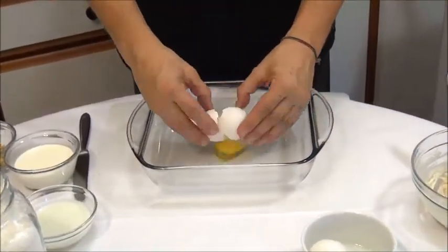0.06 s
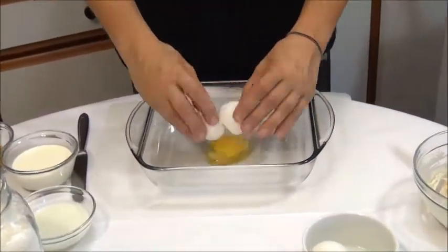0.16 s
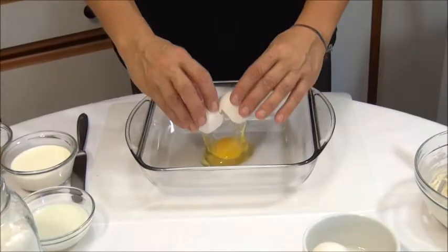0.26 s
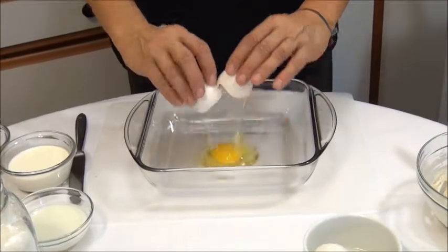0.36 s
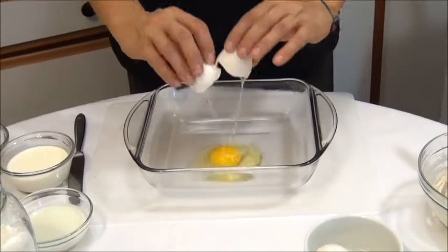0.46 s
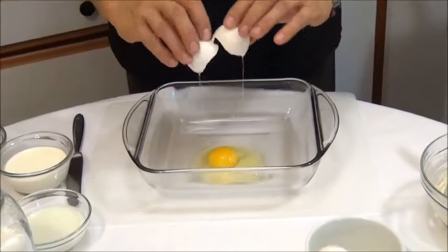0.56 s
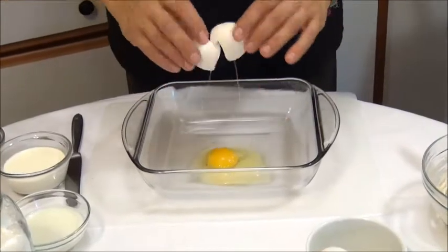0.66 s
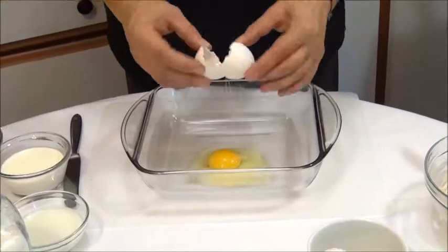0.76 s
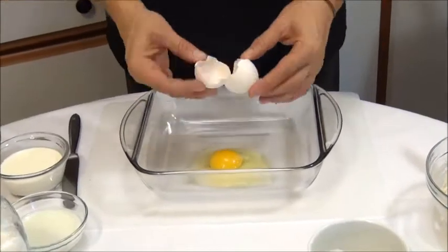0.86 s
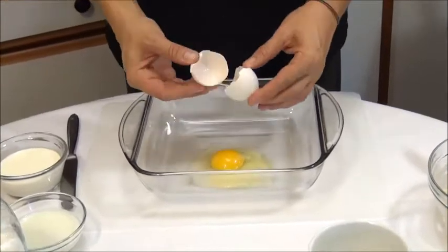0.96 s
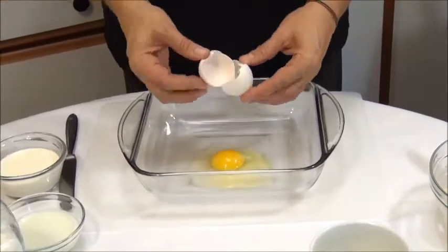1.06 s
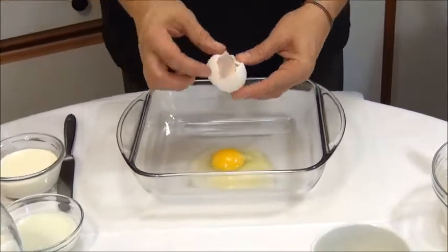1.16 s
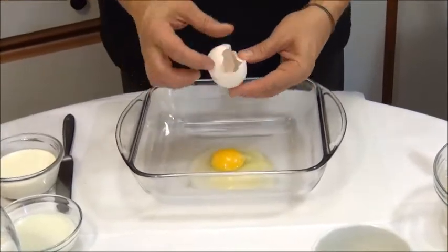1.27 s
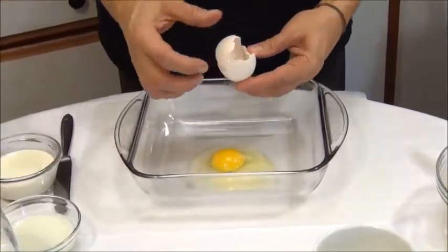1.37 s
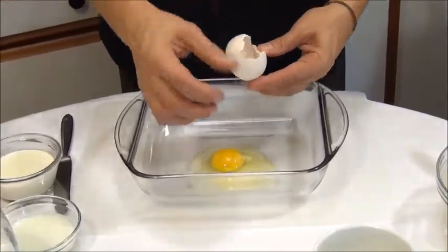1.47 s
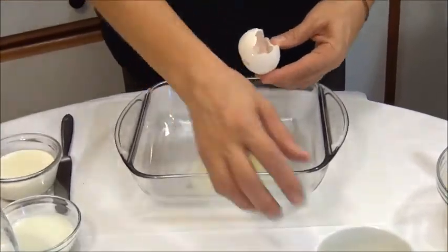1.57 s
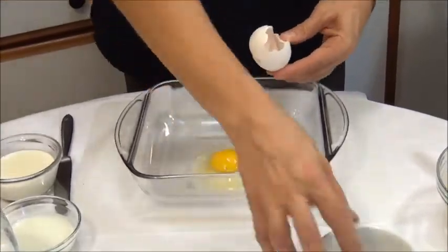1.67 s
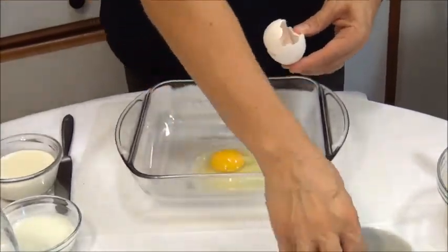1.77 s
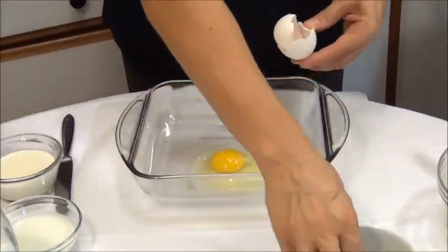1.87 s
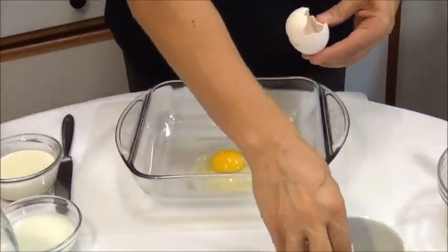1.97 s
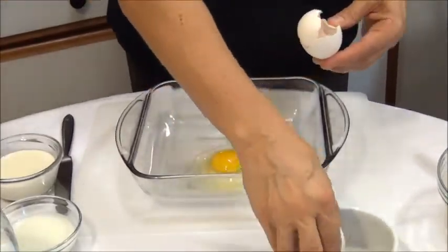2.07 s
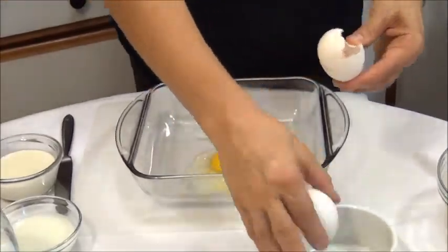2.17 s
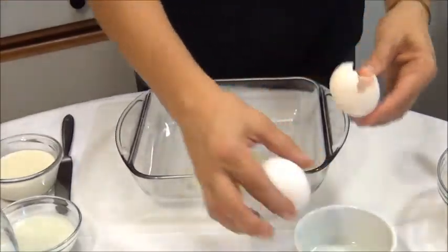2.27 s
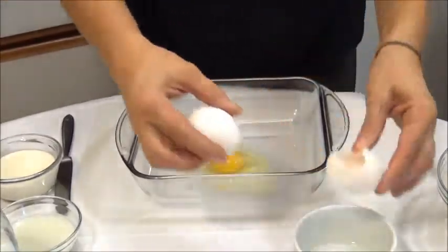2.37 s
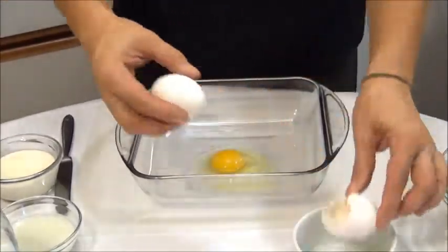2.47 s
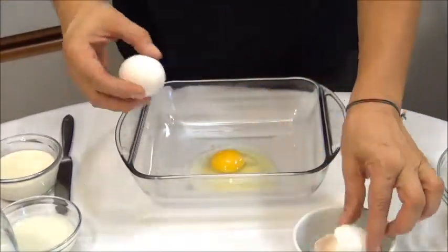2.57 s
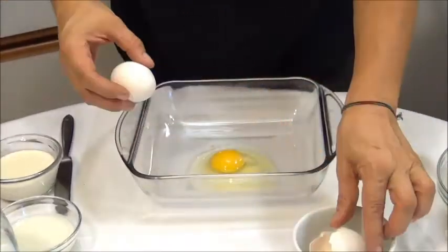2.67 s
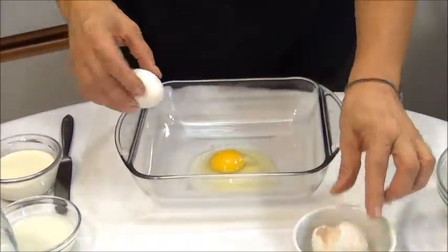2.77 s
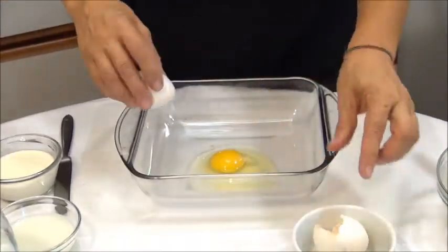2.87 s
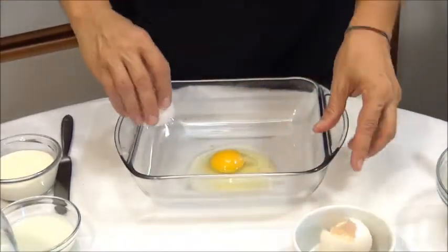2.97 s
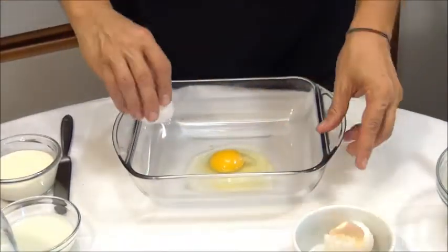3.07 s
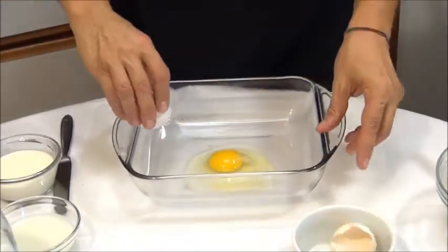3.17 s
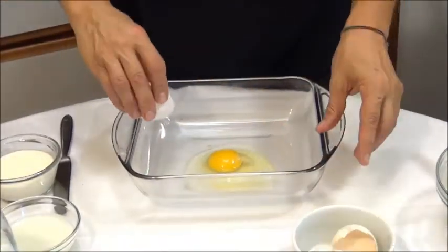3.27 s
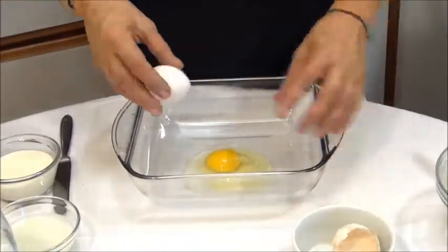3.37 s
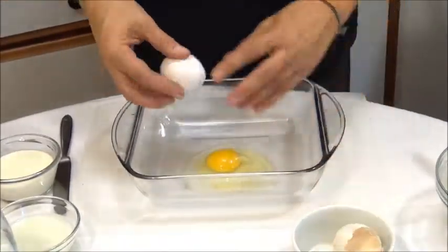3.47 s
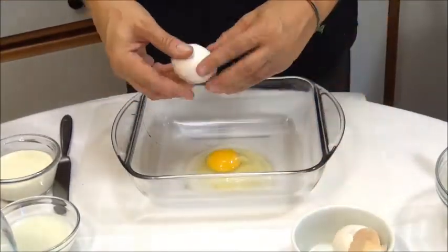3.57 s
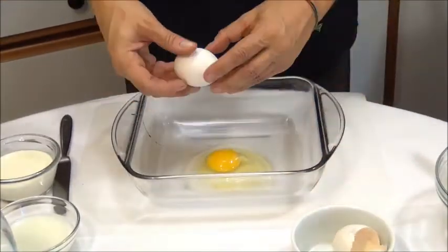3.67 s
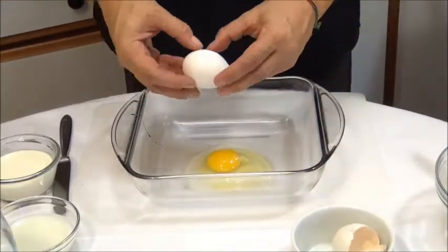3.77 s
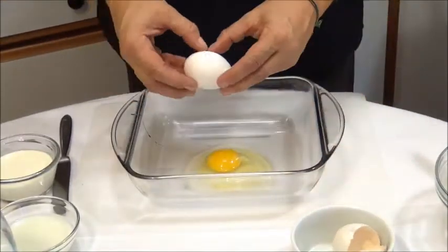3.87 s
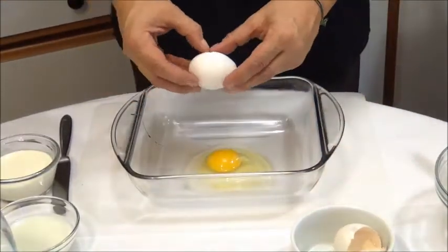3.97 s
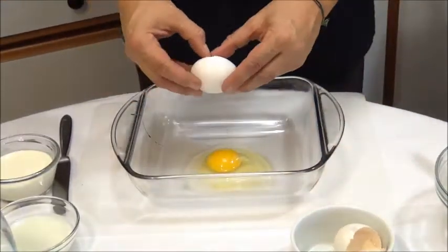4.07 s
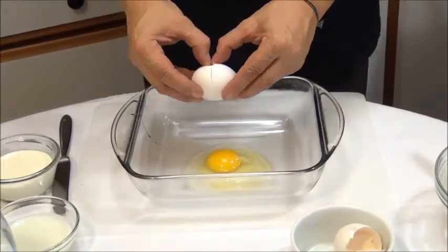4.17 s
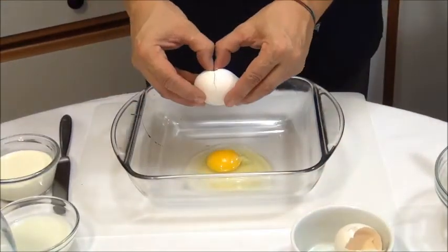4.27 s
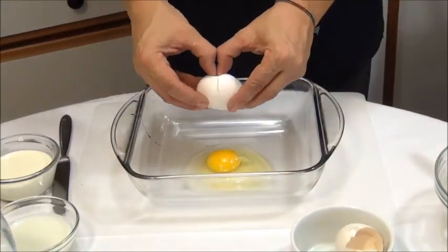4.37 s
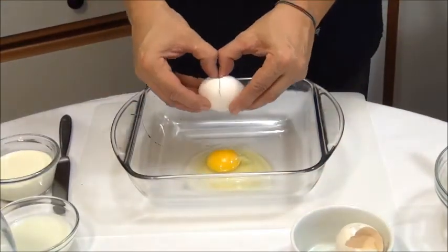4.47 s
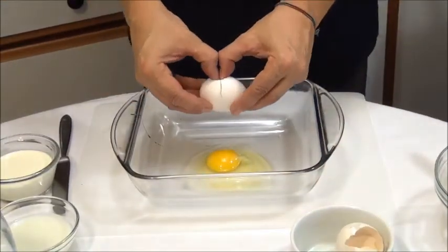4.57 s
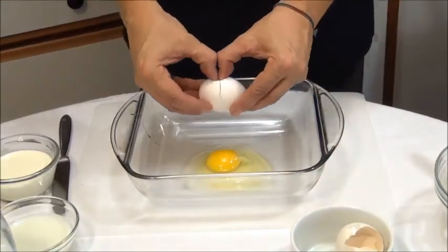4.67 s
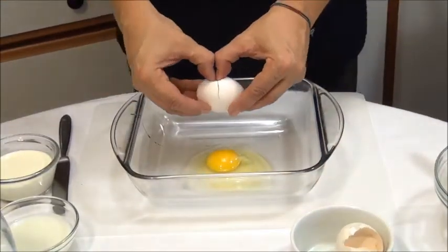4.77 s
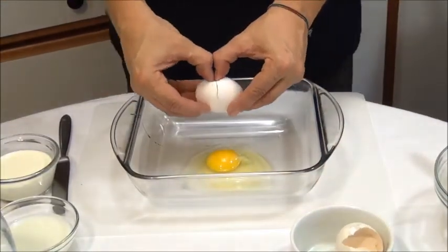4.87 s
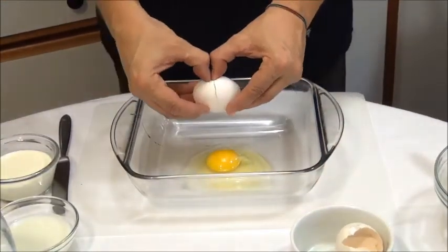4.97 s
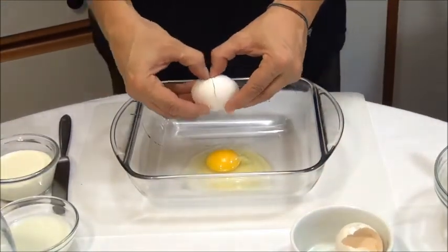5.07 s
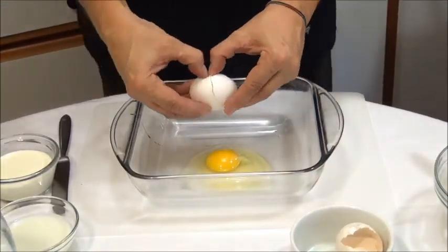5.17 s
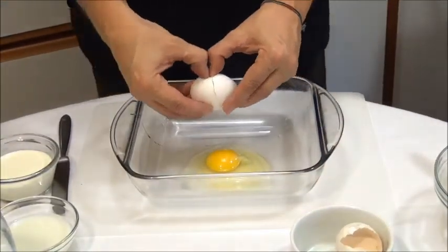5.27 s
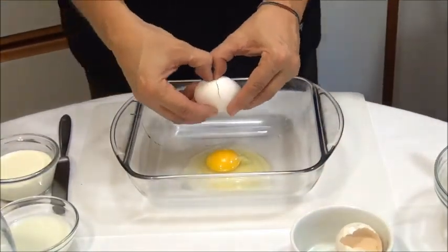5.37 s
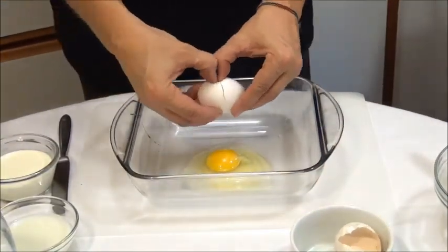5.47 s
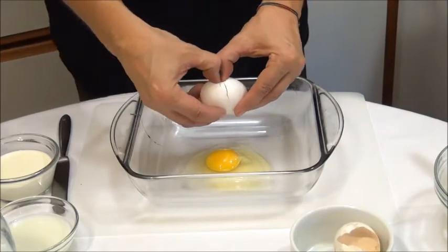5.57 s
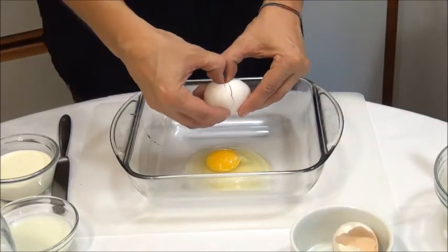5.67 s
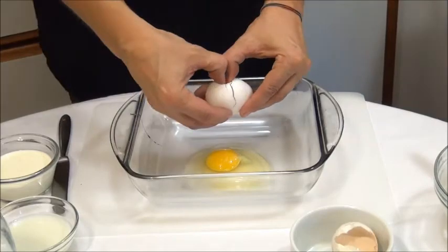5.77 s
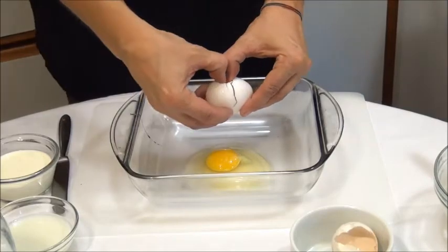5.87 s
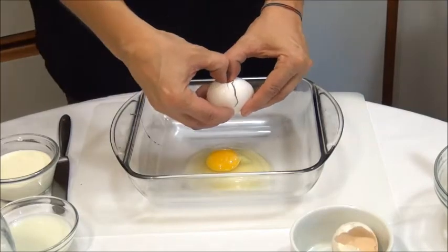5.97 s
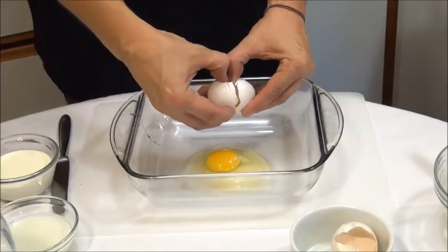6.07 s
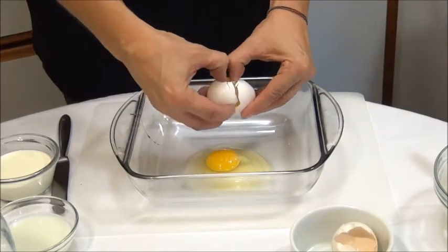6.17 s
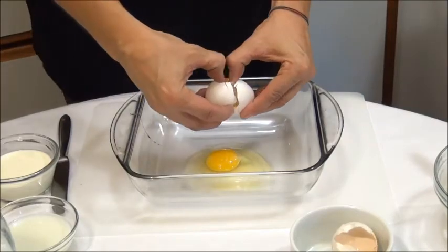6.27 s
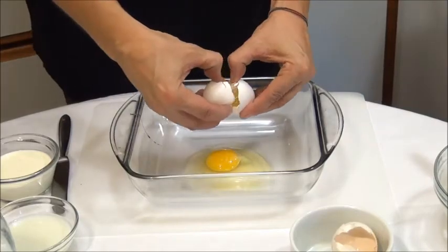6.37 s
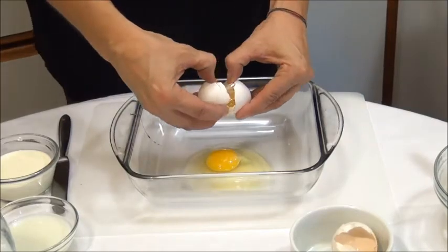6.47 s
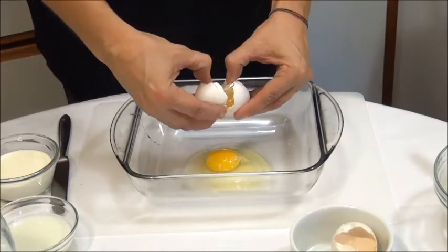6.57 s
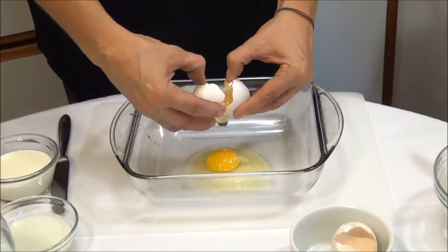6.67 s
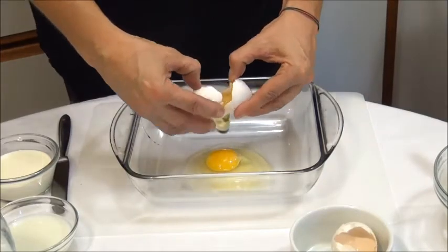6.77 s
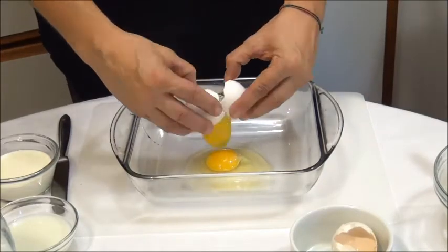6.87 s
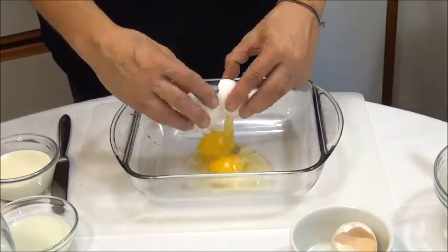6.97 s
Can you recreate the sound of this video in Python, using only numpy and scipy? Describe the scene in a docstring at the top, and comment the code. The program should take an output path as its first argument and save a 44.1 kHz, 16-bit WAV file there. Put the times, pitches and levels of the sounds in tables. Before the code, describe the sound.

An eggshell snaps and crackles apart right at the start, each crack a bright tick with a short hollow ring. Small shell ticks follow, then a loud, hollow crunch at about 1.2 seconds as the halves are pushed together. Around 1.8 seconds a china bowl is bumped and drags briefly on the tablecloth with a soft thud and rustle. At 2.7 seconds the empty shell drops into the bowl with a sharp, loud clink. A second egg knocks on the rim of a glass dish at 3.0 and 3.2 seconds, the shell crunching and the glass ringing briefly, the second knock softer. Faint, scattered ticks continue until about 6 seconds, when the shell tears open in a run of light snaps and crackles lasting to about 7 seconds. Everything is close and nearly mono, with slight kitchen reverberation over faint hum and hiss.

```python
"""Breaking eggs over a glass dish

A quiet kitchen, a near-mono microphone pair on hands working at a cloth-covered table.
Shells snap and crunch, each crack a bright tick plus the hollow ring of the half shell.
An egg is lifted from a china bowl, which drags on the cloth, and empty shells drop into it.
Two knocks of the egg on the rim set the glass dish ringing; room tone lies underneath."""
import sys
import numpy as np
from scipy import signal
from scipy.fft import rfft, irfft
from scipy.io import wavfile
from scipy.ndimage import uniform_filter1d

SR = 44100
rng = np.random.default_rng(int(sys.argv[2]) if len(sys.argv) > 2 else 0)


def wav_out(sig):
    """Save sig, one row per channel (or a flat mono array), as 16-bit PCM at SR to the path in sys.argv[1]."""
    wavfile.write(sys.argv[1], SR, np.round(np.clip(np.atleast_2d(sig).T, -1, 1) * 32767).astype(np.int16))


N = 309582

# shell fractures: t/s, hollow ring level/dB, cup f/Hz, tick level/dB
SHELL_SNAPS = [(0.028, -26.5, 1890, -65), (0.046, -27.5, 2050, -51), (0.056, -25, 1730, -58),
               (0.1376, -33, 1740, -55), (0.165, -23.5, 1700, -48), (0.1804, -27.5, 1700, -53),
               (0.3192, -52, 1820, -59.5), (0.677, -45.5, 2150, -67), (0.754, -48, 2120, -61),
               (0.841, -46, 2130, -57.5), (0.8759, -47.5, 2050, -66), (0.9092, -48, 2140, -53.5),
               (0.9376, -62, 1380, -57), (1.0827, -41.5, 2970, -55), (1.1072, -38, 1980, -48.5),
               (1.1314, -29, 2070, -49), (1.1532, -30, 1410, -59), (1.1608, -17.5, 2000, -41),
               (1.1671, -12.5, 1807, -40.5), (1.1774, -20.5, 2000, -49), (2.8895, -46, 1840, -59),
               (3.5346, -53, 920, -57.5), (3.6192, -70, 930, -54.5), (3.7118, -57, 3440, -58),
               (4.0099, -55.5, 2784, -63.5), (4.1675, -70, 2790, -55.5), (4.27, -59.5, 2970, -47.5),
               (4.4143, -51, 1394, -63), (4.6147, -46, 1567, -46), (4.9126, -70, 920, -56),
               (5.005, -69.5, 1616, -58.5), (5.712, -49.5, 1614, -73), (5.7322, -45.5, 1580, -60),
               (6.0531, -54, 1540, -58.5), (6.073, -59, 3410, -48), (6.132, -52, 3420, -48.5),
               (6.14, -51, 3120, -43), (6.1524, -41.5, 3160, -44.5), (6.2812, -50, 2260, -58),
               (6.348, -41.5, 2230, -47.5), (6.4978, -47.5, 1940, -57), (6.5084, -38, 2390, -58),
               (6.5608, -42.5, 1870, -52), (6.683, -41, 1660, -78), (6.7324, -40, 1626, -53),
               (6.7794, -42.5, 1340, -57), (6.84, -45, 1600, -61), (6.8684, -36.5, 2170, -49.5),
               (6.9224, -43, 1530, -58), (6.9442, -41, 1580, -49.5), (6.9917, -57, 1680, -56),
               (7.002, -44, 1660, -50.5)]
# shell set against shell, china or table without breaking: columns as for the fractures
SHELL_BUMPS = [(0.547, -52.5, 1320, -74), (0.726, -39, 1180, -64), (1.4305, -40, 1065, -59),
               (1.7886, -34.5, 1460, -64), (1.8256, -38, 2440, -40), (2.677, -7, 1988, -42)]
# bouts of shell being torn or rubbed: peak t/s, length/s, hollow level/dB, bright level/dB, cup f/Hz
CRUNCH_BOUTS = [(0.026, 0.21, -49, -60, 1790), (0.183, 0.096, -55, -50, 1770),
                (0.681, .1, -59.5, -65, 1700), (0.748, 0.16, -66, -63, 2150),
                (0.919, 0.14, -72, -63.5, 2100), (1.127, 0.19, -50, -55.5, 1890),
                (1.168, 0.082, -38, -42, 1720), (2.895, 0.27, -62, -62.5, 1880),
                (6.074, 0.06, -73.5, -70, 1810), (6.152, 0.055, -53, -48.5, 2540),
                (6.263, 0.22, -70, -87, 2420), (6.377, .25, -70, -67, 2300), (6.534, .2, -64, -70, 2170),
                (6.738, .16, -59.5, -59.5, 1540), (6.87, 0.29, -65.5, -67, 2040),
                (6.995, 0.27, -59, -70, 1570)]
# modes of the half shell's hollow: ratio to cup pitch, width/Hz, level/dB
CUP_MODES = [(0.998, 200.8, 2.5), (1.35, 296.8, -7.5), (1.75, 260, -6)]
# lower modes of shell and yolk: f/Hz, width/Hz, level/dB
BODY_MODES = [(797, 75, 6), (990, 130, 3), (523, 200, -4.5)]
# spans in which the handled shell still holds its yolk: from t/s, to t/s
YOLK_SPANS = [(0, .25), (2.8, 6.6)]
# spectrum of a brittle fracture: f/Hz, level/dB
FRACTURE_SPECTRUM = [(290, -33), (500, -1), (1320, -4), (3300, 5.5), (4000, 0.5), (4800, -5), (5600, 0.5),
                     (6600, 2.5), (8580, 0), (16000, -2)]
# egg on the rim: t/s, crush level/dB, crush decay/s, crush tilt/(dB/octave), table level/dB,
# glass level/dB, glass hardness/(dB/octave), hush of the still-point modes/dB
RIM_KNOCKS = [(3.0167, -21, 0.026, -1.5, -38, -0.3, 0.06, -0.2),
              (3.2069, -31, 0.023, -1, -38, -2.5, -2.1, -11.5)]
# shell caving in on glass: f/Hz, level/dB
CRUSH_SPECTRUM = [(100, -43), (200, -16.5), (514, -17.5), (905, -6.5), (1360, -9), (2000, -11.5),
                  (4670, -17.5), (6020, -11.5), (11000, -15.5), (16000, -26)]
# glass dish: f/Hz, level/dB, t60/s, whether a knock beside the mode's still point hushes it
DISH_MODES = [(350, -46, .8, False), (628, -44, .2, True), (921, -27.5, .72, False), (927, -22, .15, False),
              (1030, -29, .2, True), (1163, -42, .4, False), (1390, -20, .23, True), (1947, -40, .3, False),
              (2328, -37, .2, True), (3252, -42.5, .33, False), (3260, -40.5, .36, False),
              (3695, -43.5, .13, False), (4055, -35, .22, True), (5975, -32, .15, True),
              (6007, -31.5, .18, False), (7185, -38.5, .15, True), (8580, -47.5, .16, False),
              (9900, -41.5, .13, False)]
# china bowl: f/Hz, level/dB, t60/s
BOWL_MODES = [(2370, 0.5, 0.09), (4870, -41.5, 0.091), (5460, -27.5, 0.055), (5840, -12.5, .09),
              (6040, -11.5, 0.13), (6130, -9.5, 0.1), (6100, -14.5, .09), (10900, -30.5, 0.18)]
# taps on the bowl: t/s, level/dB, hardness/(dB/octave), contact/s
BOWL_HITS = [(1.758, -64, 4, 0.0034), (1.789, -62, 7, 0.0019), (1.822, -38, -9, 0.00053),
             (1.845, -30.5, -24, 0.0051), (2.674, -31.5, 5, 0.0018)]
# table top: f/Hz, level/dB, t60/s
TABLE_MODES = [(59, -1.5, .33), (65, -2.5, 0.35), (110, -6, 0.33), (140.3, -1.5, 0.28), (216, -3.5, 0.17),
               (262, -8, .2), (300, 4, 0.13), (430, -15, 0.35), (515, -14.5, 0.11), (573.5, -12, .15),
               (1000, -20, 0.078), (1470, -23, 0.023)]
# fingers and bowl landing on the table: t/s, level/dB, hardness/(dB/octave), contact/s
TABLE_HITS = [(0.7265, -53.5, 5.5, 0.00048), (1.7368, -47, 9, 0.0012), (1.788, -45.5, 9.5, 0.002),
              (2.675, -53.5, 6.5, 0.0016)]
# the bowl dragging on the cloth: t/s, table rumble level/dB, rustle level/dB
DRAG_CURVE = [(1.74, -51, -99), (1.768, -48, -76), (1.816, -58, -80), (1.822, -40.5, -69),
              (1.892, -75, -73), (1.93, -71, -65), (2.096, -68, -61), (2.2, -87, -93)]
# early echoes off table, chest and cupboards: delay t/s, level/dB
EARLY_ECHOES = [(.0045, -12.5), (.0093, -10.5), (0.0155, -14.5), (.022, -14), (0.028, -17.5)]
# decay of the kitchen: f/Hz, t60/s
ROOM_DECAY = [(100, .45), (500, 0.52), (1800, 0.39), (5000, 0.4), (13000, 0.19)]
# reverberation that reaches the two microphones in opposite phase: f/Hz, level/dB
ROOM_SIDE_SPECTRUM = [(60, -13), (400, -17), (1200, -13), (2400, -41), (7000, -6), (10000, -8),
                      (12000, -39.5)]
# room tone and hiss: f/Hz, relative level/dB
ROOM_TONE_SPECTRUM = [(15, -38), (25, -3.5), (137, -2), (170, -3), (206, -14), (249, 0), (270, -17),
                      (344, -4), (775, -11), (840, -12), (1190, -10.5), (1560, -12.5), (2480, -14),
                      (3920, -18), (16000, -20.5)]
# likeness of the room tone at the two microphones: f/Hz, correlation
ROOM_TONE_LIKENESS = [(60, 1), (180, 0.81), (550, 0.94), (1650, 1), (4970, 1), (15000, 0.95)]
# two wavering hums and a thin high hiss: f/Hz, width/Hz, level/dB
HUM_BANDS = [(241, 11, -79.5), (320, 20, -83.5), (15000, 440, -83)]
# imbalance of the microphone pair: f/Hz, left minus right level/dB
MIC_IMBALANCE = [(40, -4.5), (125, -2.5), (250, -0.6), (550, 1.5), (1650, 0.7), (4970, 0.1), (15000, 0.0)]
# microphone bass roll-off: f/Hz, level/dB
MIC_LOW_CUT = [(20, -9), (42, -6.5), (56, -0.5)]

FULL_DB, EMPTY_DB = -16.5, -36  # low body ring relative to the hollow ring, with and without yolk
CHIP_HZ, BUMP_HZ, TICK_SCATTER_OCTAVES = 8840, 4450, .18  # tick pitch: flying chip, dull bump
LEAD_SHARE, HOLLOW_FADE_DB, BRIGHT_FADE_DB = 0.38, -35, -25.5  # crunch: swell over length; fade per length
ROOM_TONE_DB, DRIFT_DB, BAND_LIMIT_HZ = -67, 1.6, 16300


def shell_cracks():
    """Each fracture or bump is a tick plus the short hollow ring of the half shell."""
    out, t = np.zeros(N), np.arange(1500) / SR
    ratio, width, cup_db = np.transpose(CUP_MODES)
    body_hz, body_width, body_db = np.transpose(BODY_MODES)
    body = ring(body_hz, body_db, 1.7 / body_width)[:len(t)]
    cup_decay = gain_of(cup_db) * np.exp(-np.pi * width * t[:, None])
    build_up = 1 - np.exp(-(t / 0.0012) ** 2)  # the air in the cup takes a few cycles to build
    burst = np.exp(-t / 0.002) + 0.25 * np.exp(-t / 0.0054)  # the crack runs on after the first break
    burst /= np.sqrt(np.mean(burst[:130] ** 2))  # rms 1 over the first 3 ms
    events = [(*row, CHIP_HZ) for row in SHELL_SNAPS] + [(*row, BUMP_HZ) for row in SHELL_BUMPS]
    noise = rng.standard_normal((len(events), len(t) + 1))
    chip_sizes, hisses = np.clip(noise[:, 0], -2, 2), colour(noise[:, 1:], FRACTURE_SPECTRUM)
    for (s, hollow_db, cup_hz, tick_db, usual_hz), size, hiss in zip(events, chip_sizes, hisses):
        cup = build_up * (cup_decay * np.sin(2 * np.pi * cup_hz * ratio * t[:, None])).sum(1)
        low_db = FULL_DB if any(start <= s < end for start, end in YOLK_SPANS) else EMPTY_DB
        add(out, s - .001, gain_of(hollow_db) * (cup + gain_of(low_db) * body))
        hz = usual_hz * 2 ** (TICK_SCATTER_OCTAVES * size)  # chip size sets the pitch
        tick = colour(hiss, [(hz * .36, -13), (hz * .73, -8), (hz, 0), (hz * 1.3, -9), (hz * 2.2, -18)])
        add(out, s, gain_of(tick_db) * unit_rms(tick) * burst)
    return out


def shell_crunch():
    """Dense micro-cracks crackle and ring the half shell; each bout swells fast and fades."""
    out, cup_clicks = np.zeros(N), grains(per_s=700, spread_db=1.7)
    crackle = unit_rms(colour(grains(per_s=2500, spread_db=3.8), FRACTURE_SPECTRUM))
    for s, length, hollow_db, bright_db, cup_hz in CRUNCH_BOUTS:
        near = slice(max(round(s * SR) - SR // 2, 0), round(s * SR) + SR // 2)
        t = np.arange(N)[near] / SR - s
        from_peak = np.maximum(t, -t / LEAD_SHARE) / length
        cup = np.zeros(len(t))
        for ratio, width, db in CUP_MODES:
            mode = resonate(cup_clicks[near], cup_hz * ratio, width)
            cup += gain_of(db) * resonate(mode, cup_hz * ratio, 2 * width) / width
        out[near] += gain_of(hollow_db + HOLLOW_FADE_DB * from_peak) * unit_rms(cup)
        out[near] += gain_of(bright_db + BRIGHT_FADE_DB * from_peak) * crackle[near]
    return out


def rim_crush():
    """The egg hits the rim: its shell caves in and the blow pushes the table."""
    out, t = np.zeros(N), np.arange(8000) / SR
    for s, crush_db, decay, tilt, push_db, *_ in RIM_KNOCKS:
        splinters = rng.standard_normal(len(t))
        splinters *= gain_of(1.5 * rng.standard_normal(len(t) // 40)).repeat(40)  # rough, about 1 ms a step
        envelope = (1 - np.exp(-t / .001)) * np.exp(-t / decay)
        spectrum = [(hz, db + tilt * np.log2(hz / 1000)) for hz, db in CRUSH_SPECTRUM]
        add(out, s - .001, gain_of(crush_db) * unit_rms(colour(splinters, spectrum)) * envelope)
        add(out, s, struck(TABLE_MODES, [(.004, push_db, -1.8, 0.0036)], pivot_hz=107))
    return out


def glass_dish():
    """The dish rings after each knock, less in the modes struck beside a still point."""
    out, (hz, db, t60, hushed) = np.zeros(N), np.transpose(DISH_MODES)
    for s, *_, blow_db, hardness, hush_db in RIM_KNOCKS:
        add(out, s, ring(hz, db + blow_db + hardness * np.log2(hz / 1000) + hush_db * hushed, t60))
    return out


def struck(modes, hits, pivot_hz):
    """Bowl or table rings under each blow; a harder blow favours the modes above pivot_hz."""
    out, (hz, db, t60) = np.zeros(N), np.transpose(modes)
    for s, blow_db, hardness, contact in hits:
        add(out, s, ring(hz, db + blow_db + hardness * np.log2(hz / pivot_hz), t60, contact))
    return out


def bowl_drag():
    """Slips on the cloth rustle and shake the table; the bowl sings faintly."""
    t, (times, rumble_db, rustle_db) = np.arange(N) / SR, np.transpose(DRAG_CURVE)
    gate = np.clip(np.minimum(t - times[0], times[-1] - t) / 0.011, 0, 1)
    slip = rng.standard_normal(N)
    wood = sum(gain_of(db) * resonate(slip, hz, width=26) for hz, db, _ in TABLE_MODES[5:10])
    china = sum(gain_of(db) * resonate(slip, hz, width=17) for hz, db, _ in BOWL_MODES)
    cloth = colour(slip, [(300, -10), (1500, 2.5), (4500, -6.5), (8000, .5), (13000, -1.5), (16000, -14)])
    rumble = gain_of(np.interp(t, times, rumble_db)) * unit_rms(wood)
    rustle = gain_of(np.interp(t, times, rustle_db)) * (cloth + gain_of(15) * china)
    return gate * (rumble + rustle)


def kitchen_reverb(x, tail_db):
    """Echoes off nearby surfaces, then a sparse tail from the room, in mid and side."""
    taps = np.zeros((2, SR // 2))
    arrivals = np.arange(300, SR // 2 - 20, 20) + rng.integers(0, 20, (2, (SR // 2 - 301) // 20))
    np.put_along_axis(taps, arrivals, rng.choice([-1., 1.], arrivals.shape), 1)
    hz, t, spectra = signal.stft(taps, SR, nperseg=512)
    decay = gain_of(-60 * t / curve_at(ROOM_DECAY, hz)[:, None])
    tail = signal.istft(spectra * decay, SR, nperseg=512)[1]
    mid, side = gain_of(tail_db) * tail / np.linalg.norm(tail[0])
    for s, db in EARLY_ECHOES:
        add(mid, s, np.array([gain_of(db)]))
    side = colour(side, ROOM_SIDE_SPECTRUM)
    return signal.fftconvolve(x[None], np.array([mid + side, mid - side]), axes=1)[:, :N]


def room_tone():
    """The quiet kitchen: noise whose bands drift slightly in level, with faint hum and hiss."""
    frames, hz = N // 256 + 5, np.fft.rfftfreq(1024, 1 / SR)
    left_re, left_im, other_re, other_im, drift = rng.standard_normal((frames, 513, 5)).T
    drift = unit_rms(uniform_filter1d(uniform_filter1d(drift, size=10, axis=0), size=20, axis=1))
    likeness = curve_at(ROOM_TONE_LIKENESS, hz)[:, None]
    left = left_re + 1j * left_im
    right = likeness * left + np.sqrt(1 - likeness ** 2) * (other_re + 1j * other_im)
    shape = gain_of(curve_at(ROOM_TONE_SPECTRUM, hz)[:, None] + DRIFT_DB * drift)
    air = signal.istft(np.array([left, right]) * shape, nperseg=1024, noverlap=768)[1][:, :N]
    hum = sum(gain_of(db) * unit_rms(resonate(rng.standard_normal(N), f, width))
              for f, width, db in HUM_BANDS)
    return gain_of(ROOM_TONE_DB) * unit_rms(air) + hum


def ring(hz, db, t60, rise=0.00072):
    """Sum of dying modes; t60 and rise in seconds."""
    t = np.arange(3 * SR // 4)[:, None] / SR
    return (gain_of(db - 60 * t / t60) * (1 - np.exp(-t / rise)) * np.sin(2 * np.pi * hz * t)).sum(1)


def resonate(x, hz, width):
    """A resonance width Hz wide: shifts hz down to zero, smooths, and shifts back."""
    carrier = np.exp(2j * np.pi * hz * np.arange(1, len(x) + 1) / SR)
    pole = np.exp(-np.pi * width / SR)
    return 2 * (carrier * signal.lfilter([1 - pole], [1, -pole], x / carrier)).real


def grains(per_s, spread_db):
    """Sparse clicks of random sign and uneven size."""
    size = gain_of(spread_db * np.minimum(rng.exponential(1, N), 4)) * rng.choice([-1, 1], N)
    return unit_rms(size * (rng.random(N) < per_s / SR))


def colour(x, points):
    """Shapes x by a spectrum of f/Hz, level/dB."""
    hz = np.fft.rfftfreq(x.shape[-1], 1 / SR)
    return irfft(rfft(x) * gain_of(curve_at(points, hz)), x.shape[-1])


def curve_at(points, hz):
    """Interpolates on a log frequency axis."""
    f, value = np.transpose(points)
    return np.interp(np.log(hz + 1), np.log(f + 1), value)


def add(mix, s, sound):
    """Mixes a sound in at time s."""
    part = mix[max(round(s * SR), 0):][:len(sound)]
    part += sound[:len(part)]


def gain_of(db):
    """Decibels to gain."""
    return 10 ** (np.asarray(db) / 20)


def unit_rms(x):
    """Scales to rms 1."""
    return x / np.sqrt(np.mean(x ** 2) + 1e-20)


def scene():
    """Cracks and handling fill the room; glass and china reach the microphones mostly direct."""
    handling = shell_cracks() + shell_crunch() + rim_crush() + bowl_drag()
    handling += struck(TABLE_MODES, TABLE_HITS, pivot_hz=284)
    rings = glass_dish() + struck(BOWL_MODES, BOWL_HITS, pivot_hz=2331)
    reverb = kitchen_reverb(handling + gain_of(-4.0) * rings, tail_db=-7.5)
    return handling + rings + reverb + room_tone()


def record(dry):
    """The microphone pair: bass roll-off and unequal sides, then the band limit."""
    hz = np.fft.rfftfreq(N, 1 / SR)
    response_db = np.outer([.5, -.5], curve_at(MIC_IMBALANCE, hz)) + curve_at(MIC_LOW_CUT, hz)
    pair = irfft(rfft(dry) * gain_of(response_db), N)
    low_pass = signal.firwin(511, BAND_LIMIT_HZ, window=("kaiser", 9), fs=SR)
    return signal.oaconvolve(pair, low_pass[None], "same")


dry = scene()
out = record(dry)
wav_out(out)
```